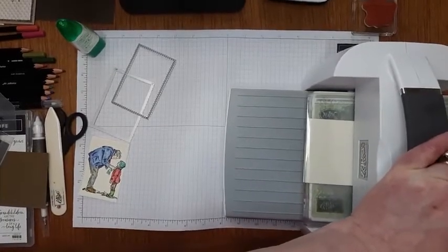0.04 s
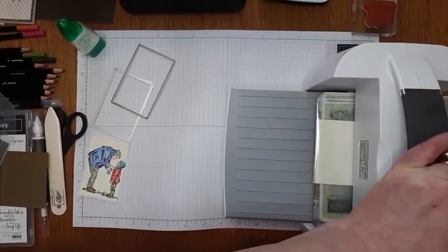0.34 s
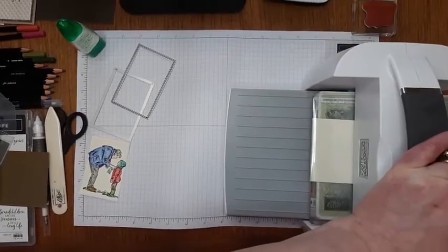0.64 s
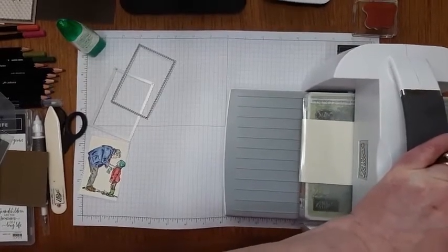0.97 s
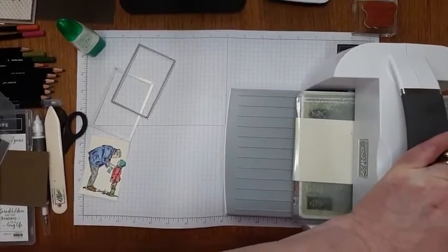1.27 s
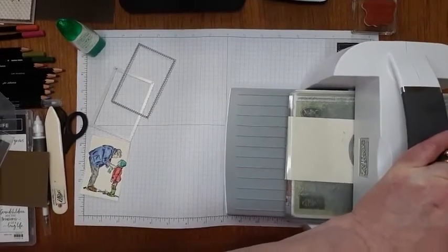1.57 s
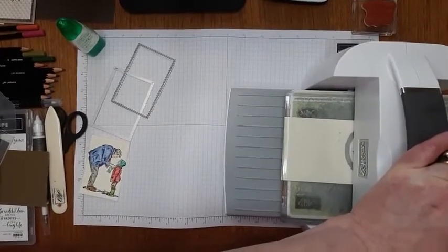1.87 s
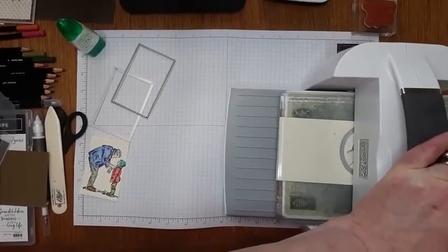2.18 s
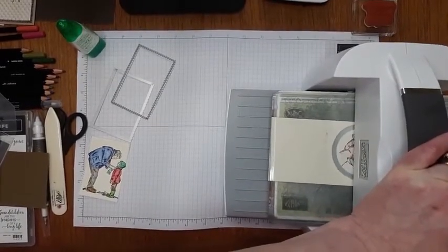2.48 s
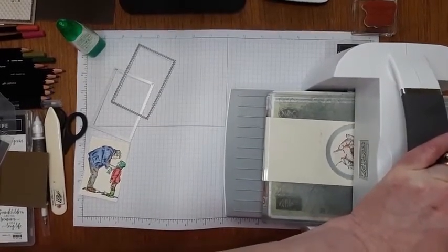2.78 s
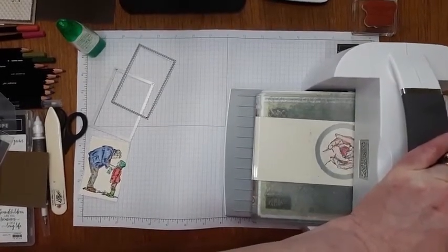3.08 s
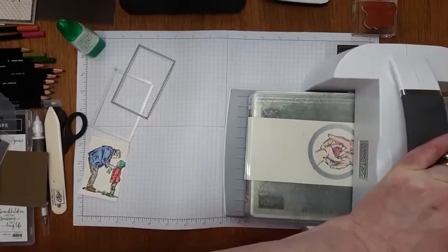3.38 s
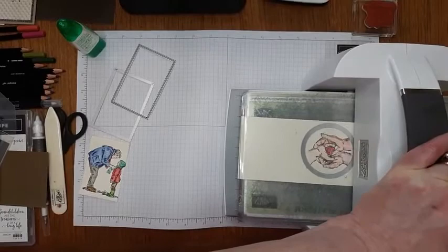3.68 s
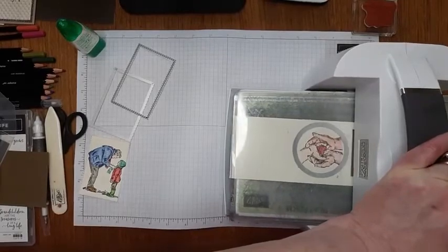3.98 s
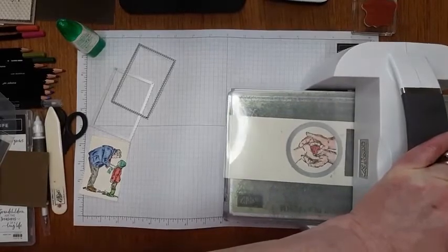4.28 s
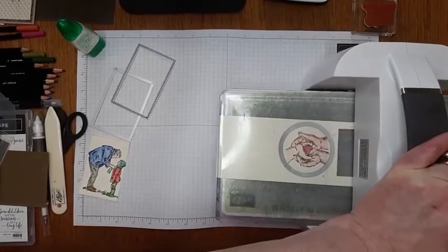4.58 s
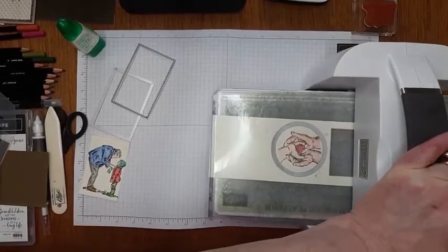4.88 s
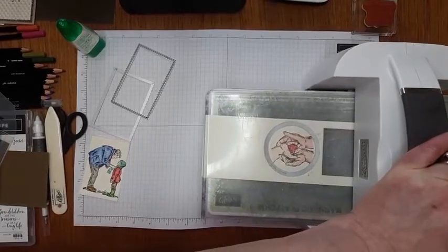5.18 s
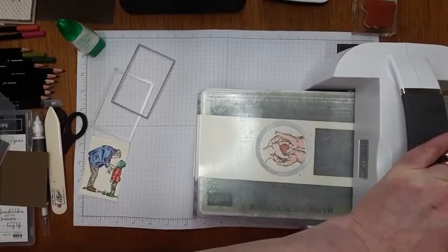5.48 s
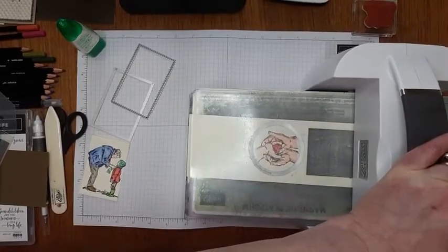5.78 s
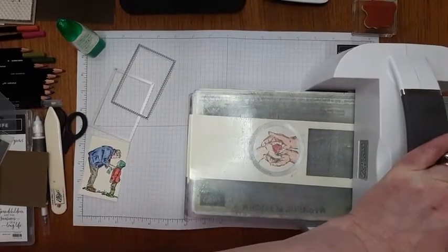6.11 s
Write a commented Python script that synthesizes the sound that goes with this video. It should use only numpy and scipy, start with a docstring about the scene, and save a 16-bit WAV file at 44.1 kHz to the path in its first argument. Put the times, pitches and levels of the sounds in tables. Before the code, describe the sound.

A hand-cranked die-cutting machine rolls plastic plates through with faint grinding, small knocks and three loud, rattling clunks.

```python
"""A hand-cranked die-cutting machine on a wooden desk rolls plastic plates through, in a small room.
From the start rollers rumble, gears grind, plates scrape and the crank knocks softly over faint hiss.
At 0.24 s and 2.89 s the squeezed stack snaps over an edge: a loud, rattling clunk, a thump on the desk.
Near 5 s the freed end swishes over the bed and the plastic squeaks under load.
A third clunk follows at 5.58 s; the freed plates tap and ping."""
import sys
import numpy as np
from scipy import signal
from scipy.fft import rfft, irfft
from scipy.io import wavfile

SR = 44100
rng = np.random.default_rng(int(sys.argv[2]) if len(sys.argv) > 2 else 0)


def to_wav(sig):
    """Store sig (one row per channel, or 1-D mono) as 16-bit WAV at the path in sys.argv[1].

    Samples outside -1..1 are clipped; the rate is SR.
    """
    pcm = np.clip(np.atleast_2d(sig), -1, 1) * 32767
    pcm = np.round(pcm).astype(np.int16)
    wavfile.write(sys.argv[1], SR, pcm.T)  # frames by channels


N = 275562
TIME_S = np.arange(N) / SR
FREQ_HZ = np.fft.rfftfreq(N, 1 / SR)


def amp(db):
    """Decibels to gain."""
    return 10 ** (np.asarray(db) / 20)


def unit(x):
    """Scale to rms 1."""
    return x / np.sqrt(np.mean(x ** 2) + 1e-20)


def decay(t, t60_s):
    """Exponential fall, 60 dB in t60_s."""
    return np.exp(-np.log(1000) * t / t60_s)


def bell(offset, half_width):
    """Gaussian, 1/e at half_width."""
    return np.exp(-(offset / half_width) ** 2)


def curve(points, hz):
    """Interpolate on a log-frequency axis."""
    freq_hz, value = np.transpose(points)
    return np.interp(np.log(hz + 1), np.log(freq_hz), value)


def add(mix, start_s, sound):
    """Mix a sound in at start_s."""
    part = mix[max(round(start_s * SR), 0):][:len(sound)]
    part += sound[:len(part)]


def minimum_phase(gain):
    """Response with these gains that rings only after its cause."""
    log_gain = np.log(gain + 1e-9)
    mirrored = np.concatenate([log_gain, log_gain[-2:0:-1]])
    return np.exp(np.conj(signal.hilbert(mirrored)))[:len(gain)]


def coloured(x, spectrum):
    """Filter x by a spectrum; rms 1."""
    return unit(irfft(rfft(x) * amp(curve(spectrum, FREQ_HZ)), N))


# Room decay: freq_hz, t60_s
ROOM_DECAY = [(100, 0.55), (400, 0.34), (1000, .43), (2500, .36), (5500, .31), (8500, 0.22), (13000, 0.23)]

def room(build_s=0.0067, size=22050):
    """Dense reflections build up, then die sooner in the treble; energy 1."""
    hz, t, noise = signal.stft(rng.standard_normal(size), SR, nperseg=256)
    damped = noise * decay(t, curve(ROOM_DECAY, hz)[:, None])
    tail = signal.istft(damped, SR, nperseg=256)[1][:size]
    tail *= 1 - bell(np.arange(size) / SR, build_s)
    return tail / np.linalg.norm(tail)


# Plate and tray resonances: centre_hz, width_hz, height_db
PLATE_RESONANCES = [(712, 150, 5.5), (1060, 260, 5.5), (1608, 76, 4.5), (1846, 30, 4), (2180, 27, 0.5),
                    (2610, 150, 2), (3320, 21, 1.5), (3680, 260, 4.5), (4520, 120, 4.5), (5440, 260, 4),
                    (6280, 90, -0.5), (6830, 750, 3), (7070, 140, 0.5)]

def plate_gain_db(hz):
    """Short-lived resonances of plates and tray colour each contact."""
    return sum(height_db / (1 + (2 * (hz - centre_hz) / width_hz) ** 2)
               for centre_hz, width_hz, height_db in PLATE_RESONANCES)


def micro_slips(per_s, spread_db):
    """Random train of tiny slips, a few much larger than the rest."""
    sizes = amp(spread_db * np.minimum(rng.exponential(1, N), 4))
    return unit(sizes * rng.standard_normal(N) * (rng.random(N) < per_s / SR))


def friction(level_db, spectrum, per_s, spread_db, wet_db):
    """Tiny slips shake a machine part, ring in the plates and echo in the room."""
    slips = micro_slips(per_s, spread_db)
    echoing = slips + amp(wet_db) * signal.fftconvolve(slips, room())[:N]
    resonant = irfft(rfft(echoing) * amp(plate_gain_db(FREQ_HZ)), N)
    return amp(level_db) * coloured(resonant, spectrum)


# Relative friction levels: time_s, rumble_db, grind_db, scrape_db
CRANK_LEVELS = [(0, -54, -58.5, -57), (.19, -72, -80.5, -82), (.65, -71.5, -70.5, -76),
                (.86, -61.5, -58, -108), (1.049, -72.5, -69, -79.5), (1.278, -68.5, -59, -62),
                (1.55, -65, -67, -74.5), (1.76, -72.5, -78.5, -84), (2.07, -72.5, -78.5, -83),
                (2.219, -62.5, -63.5, -77), (2.601, -64.5, -64, -76), (3.348, -68, -66.5, -74),
                (3.681, -83, -79, -96), (3.97, -67.5, -66.5, -78), (4.3, -72, -71, -87.5),
                (4.72, -64.5, -64, -84), (5.5, -63, -66.5, -83), (6.25, -63.5, -57, -65)]
# Roller, gear and plate spectra: freq_hz, gain_db
ROLLER_SPECTRUM = [(25, -25.5), (60, -14), (110, -7), (170, -0.5), (240, -8), (420, -8), (600, -12),
                   (1200, -51)]
GEAR_SPECTRUM = [(300, -28.5), (550, -10), (720, -3), (860, -8.5), (1040, -0.5), (1320, -9), (1680, -10.5),
                 (2200, -19), (4000, -39)]
SCRAPE_SPECTRUM = [(900, -24), (1700, 8), (2300, 2.5), (3100, -8.5), (3700, -1.5), (4800, -15),
                   (7000, -13.5), (9000, -33.5), (14000, -38)]

def cranking():
    """Rollers rumble, gears grind, plates scrape along the bed."""
    time_s, *levels_db = np.transpose(CRANK_LEVELS)
    rumble_db, grind_db, scrape_db = (np.interp(TIME_S, time_s, db) for db in levels_db)
    rollers = friction(rumble_db + 2, ROLLER_SPECTRUM, per_s=1300, spread_db=2.5, wet_db=0)
    gears = friction(grind_db - 2.5, GEAR_SPECTRUM, per_s=800, spread_db=3.5, wet_db=0.5)
    scrape = friction(scrape_db - 1.5, SCRAPE_SPECTRUM, per_s=820, spread_db=7, wet_db=6.5)
    return rollers + gears + scrape


# Hiss spectrum: freq_hz, gain_db
HISS_SPECTRUM = [(25, 3), (150, 10), (500, -2.5), (2000, 3), (4500, 4), (6000, 3.5), (6900, 12.5),
                 (7600, -0.5), (14000, 1)]

def hiss(level_db=-75, sink_s=0.9, hold_s=0.26, return_s=0.92):
    """Faint hiss peaking near 7 kHz; dips after the first two clunks, lifts slightly after the third."""
    corners_s = np.cumsum([0, sink_s, hold_s, return_s])
    dip_db = sum(depth_db * np.interp(TIME_S - snap_s, corners_s, [0, 1, 1, 0])
                 for snap_s, *_, depth_db in STACK_CLUNKS)
    return amp(level_db - dip_db) * coloured(rng.standard_normal(N), HISS_SPECTRUM)


# Struck housing spectrum: freq_hz, gain_db
HOUSING_SPECTRUM = [(30, -28.5), (70, -23), (115, -6), (165, 0.5), (225, -2), (420, -2.5), (600, -5),
                    (930, -5), (1400, -6), (2600, -5.5), (4600, -11), (7000, -8.5), (8600, -20.5),
                    (14000, -26.5)]

def blow(bass_db, treble_db, spot_hz, spot_db, chatter_s, size=8192):
    """One chattering contact: harder is brighter, and the struck spot adds its pitch."""
    t, hz = np.arange(size) / SR, np.fft.rfftfreq(size, 1 / SR)
    chatter = rfft(rng.standard_normal(size) * (0.23 + t / chatter_s) * bell(t, chatter_s))
    hardness_db = curve([(220, bass_db), (800, 0.0032), (1500, 0.0068), (6000, treble_db)], hz)
    spot_peak_db = spot_db * bell(np.log((hz + 1) / spot_hz), 0.18)
    colour = amp(curve(HOUSING_SPECTRUM, hz) + plate_gain_db(hz) + hardness_db + spot_peak_db)
    # Flattened chatter spreads the blow in time; machine and contact set the colour.
    magnitude = np.hypot(abs(chatter), 0.25 * abs(chatter).mean()) / 1.09
    return irfft(chatter * minimum_phase(colour / magnitude))


# Housing, plate and desk modes: pitch_hz, relative_db, uncapped_t60_s
BODY_MODES = [(141, -9.5, 0.12), (166, -4, .42), (287.4, -5.5, 0.93), (335.3, -3, 0.99), (398, -0.5, 0.41),
              (465.5, -3.5, .25), (520, -7, .35), (677, -5, .35), (785, -10, .32), (853, -2.5, 0.85),
              (861, -8.5, .28), (955, -4, .28), (999, 10, 0.033), (1086, -1.5, 0.11), (1155, -3, .3),
              (1605, -2.5, 0.089), (1760, -0.5, 0.22), (1922, -6.5, .26), (2280, -6.5, 0.18),
              (2710, 3.5, 0.11), (3320, -4, .25), (4930, -5, 0.18)]

def body_ring(max_t60_s=0.4, size=22050):
    """Modes left ringing by a blow; energy 1."""
    t = np.arange(size) / SR
    hz, db, t60_s = np.transpose(BODY_MODES)[:, :, None]
    envelopes = amp(db) * decay(t, np.minimum(t60_s, max_t60_s))
    modes = (envelopes * np.sin(2 * np.pi * (hz * t + rng.random(hz.shape)))).sum(0)
    return modes / np.linalg.norm(modes)


def strikes(rows, chatter_s, gain_db, ring_db, wet_db):
    """Each blow sounds directly, then as a tail through the ringing machine and the room."""
    out = np.zeros(N)
    for start_s, level_db, bass_db, treble_db, spot_hz, spot_db, tail_db in rows:
        hit = amp(level_db + gain_db) * blow(bass_db, treble_db, spot_hz, spot_db, chatter_s)
        response = amp(wet_db) * room() + amp(ring_db) * body_ring()
        add(out, start_s, hit)
        add(out, start_s, amp(tail_db) * signal.fftconvolve(hit, response))
    return out


# Light blows: start_s, relative_db, treble_db, spot_hz, spot_db, tail_db
CRANK_KNOCKS = [(.027, -54.5, -7, 1610, 8, -9), (.8315, -50, -5.5, 2210, 4.5, -0.5),
                (1.3715, -51.5, -16.5, 3630, 12, -4), (1.8327, -58, -25.5, 641, 6, -2),
                (1.8522, -43.5, -22, 1827, 10.5, -1), (2.319, -48.5, -28, 1067, 12, -6),
                (2.419, -51.5, -33.5, 1100, 6.5, -6.5), (2.7368, -58, -42, 650, 7, -1.5),
                (2.758, -47, -46, 1115, 9, -5), (3.067, -40, -3, 1120, 8.5, -0.5),
                (3.145, -45, -15.5, 2520, 5, -4), (3.4226, -47.5, -2.5, 2080, 5.5, 0.5),
                (3.431, -51.5, -3.5, 1830, 9.5, -14), (4.103, -65, -25, 1047, 9.5, 0),
                (4.401, -63.5, -30.5, 630, 16.5, 1.5), (4.651, -56.5, -20.5, 1086, 6.5, -5),
                (5.3846, -43.5, -24.5, 1250, 4, 0), (5.5155, -51, -15, 1680, 5.5, 3),
                (5.535, -53, -4.5, 2470, 15, 7.5), (5.613, -38.5, -7, 806, -3, -1),
                (5.6255, -40.5, 8.5, 7160, -1.5, -3), (5.635, -37, -8, 4000, 15.5, -6.5),
                (5.668, -36, -10, 730, 0, -24), (5.6975, -39, -4, 3510, 3.5, -8.5),
                (5.742, -48, -19.5, 2630, 9.5, 6.5), (5.763, -54, 4.5, 3320, 7, -7),
                (5.9294, -40, -9.5, 1364, 5.5, -1.5), (5.962, -51, -3, 3520, 9, 12),
                (5.9803, -36.5, -3, 690, 7.5, -7.5), (6.1389, -45, -18, 990, 4, -1.5),
                (6.189, -56.5, -7, 5150, 10.5, -0.5)]

def knocks(bass_db=-2):
    """Play in the crank and taps of the plates knock the housing."""
    rows = [(start_s, level_db, bass_db, *colour) for start_s, level_db, *colour in CRANK_KNOCKS]
    return strikes(rows, chatter_s=0.0055, gain_db=36.5, ring_db=-9.5, wet_db=-2)


# One clunk per crank turn: snap_s, relative_db, bass_db, treble_db, snap_hz, tail_db,
# slip_lead_s, slip_db, land_delay_s, land_db, land_hz, bounce_gap_s, hiss_dip_db
STACK_CLUNKS = [(0.2372, -20, -1.5, -2, 882, -2, .0125, -12, .0225, -2.5, 439, .007, 11.5),
                (2.8895, -26, 0.5, 4.5, 1900, -1, .014, -13, .025, -2, 494.7, 0.011, 8.5),
                (5.579, -24.5, 0, -17, 2610, -6.5, .0105, -9, .011, -12, 720, .0055, -1)]

def clunk(snap_s, level_db, bass_db, treble_db, snap_hz, tail_db,
          slip_lead_s, slip_db, land_delay_s, land_db, land_hz, bounce_gap_s):
    """The squeezed stack slips twice, snaps over an edge, touches down, lands and bounces."""
    tray_hz, slip_bass_db = 1110, -10  # slips sound the hollow tray
    slip_spot_db, snap_spot_db, land_spot_db = 8, 3, 7
    slip_colour = (slip_bass_db, treble_db + 4.5, tray_hz, slip_spot_db, tail_db - 1.5)
    first_slip = (snap_s - 2 * slip_lead_s, level_db + slip_db - 27.5, *slip_colour)
    second_slip = (snap_s - slip_lead_s, level_db + slip_db, *slip_colour)
    snap = (snap_s, level_db, bass_db - 9, treble_db, snap_hz, snap_spot_db, tail_db)
    bounces = []
    for k in range(-1, 4):  # -1: touchdown, 0: landing; each contact heavier and duller
        start_s = snap_s + land_delay_s + k * bounce_gap_s
        bounce_db = level_db + land_db - 2 * abs(k)
        colour = (bass_db + 2 + k, treble_db + 0.5 - 4 * k, land_hz, land_spot_db, tail_db - 8)
        bounces.append((start_s, bounce_db, *colour))
    stages = [([first_slip], 0.0045), ([second_slip], 0.006), ([snap], 0.0045), (bounces, 0.007)]
    return sum(strikes(rows, chatter_s, gain_db=43.5, ring_db=-12, wet_db=1)
               for rows, chatter_s in stages)


# Thin plate tones: pitch_hz, relative_db
PLATE_PARTIALS = [(1577, -55.5), (1922, -55), (2724, -56.5), (3569, -59), (4581, -60), (4850, -62.5),
                  (5604, -57.5), (6449, -60.5), (6880, -58), (7294, -59.5)]

def plate_ring(gain_db=26, rise_s=0.012, t60_s=0.33):
    """Each snap sets the plates ringing; the harder and brighter, the louder."""
    t, out = np.arange(SR) / SR, np.zeros(N)
    envelope = (1 - np.exp(-t / rise_s)) * decay(t, t60_s)
    for snap_s, level_db, _, treble_db, *_ in STACK_CLUNKS:
        tones = sum(amp(db) * np.sin(2 * np.pi * (hz * t + rng.random())) for hz, db in PLATE_PARTIALS)
        add(out, snap_s, amp(gain_db + level_db + treble_db) * envelope * tones)
    return out


# Low swings: centre_s, peak_db, pitch_hz, half_length_s
DESK_THUMPS = [(.27, -26, 140, 0.013), (2.93, -25, 171.7, 0.028), (2.921, -38, 80, .025),
               (3.94, -55.5, 125, 0.021), (4.331, -49.5, 77, 0.0058), (4.663, -50.5, 178.4, 0.013),
               (4.844, -47, 191.4, 0.0099), (4.886, -55.5, 178.3, 0.019), (5.607, -50.5, 44.7, 0.031)]

def thumps():
    """The machine rocks softly on the desk."""
    return sum(amp(db) * bell(TIME_S - centre_s, half_s) * np.sin(2 * np.pi * hz * (TIME_S - centre_s))
               for centre_s, db, hz, half_s in DESK_THUMPS)


# Gritty swells: centre_s, relative_db, half_length_s, centre_hz, spread_octaves
BED_RUBS = [(.795, -64, .04, 1500, 1.1), (1.19, -60, .02, 1500, 1.1), (1.285, -61, .06, 2200, 1.8),
            (1.53, -70, .05, 2700, 1.1), (1.6, -63, .025, 1850, .7), (2.19, -59, .04, 1250, .8),
            (2.36, -61, .025, 1500, 1), (2.545, -61, .03, 1900, .6), (3.345, -61, .02, 1500, .9),
            (4.48, -68, .02, 1700, .7), (5.31, -60, .015, 1200, 1.2)]

def rubs(gain_db=-1, wet_db=-5):
    """The plates catch and rub on the bed in short swells of tiny slips."""
    body = amp(curve(HOUSING_SPECTRUM, FREQ_HZ) + plate_gain_db(FREQ_HZ))
    out = np.zeros(N)
    for centre_s, level_db, half_s, centre_hz, octaves in BED_RUBS:
        band = bell(np.log2((FREQ_HZ + 1) / centre_hz), octaves)
        slips = micro_slips(per_s=2500, spread_db=3)
        grit = unit(irfft(rfft(slips) * band * body, N))
        out += amp(level_db + gain_db) * bell(TIME_S - centre_s, half_s) * grit
    return out + amp(wet_db) * signal.fftconvolve(out, room())[:N]


# Sliding plastic spectrum: freq_hz, gain_db
SLIDE_SPECTRUM = [(3500, -29), (5200, -2), (6900, 2.5), (7800, -22)]

def slide(centre_s=5.08, half_length_s=0.89, level_db=-79):
    """The freed end of the stack slides over the bed: a thin swish that swells and fades."""
    swish = friction(level_db, SLIDE_SPECTRUM, per_s=5000, spread_db=2.5, wet_db=-0.5)
    return bell(TIME_S - centre_s, half_length_s) * swish


def squeak(start_s=4.88, end_s=5.28, from_hz=1720, to_hz=1850, fuzz_hz=110, level_db=-72):
    """Plastic rubs under load: a faint, fuzzy, rising whine."""
    progress = np.clip((TIME_S - start_s) / (end_s - start_s), 0, 1)
    lowpass = signal.butter(2, fuzz_hz, fs=SR, output="sos")
    fuzz_i, fuzz_q = unit(signal.sosfilt(lowpass, rng.standard_normal((2, N))))
    phase = 2 * np.pi * np.cumsum(from_hz + (to_hz - from_hz) * progress) / SR
    envelope = np.sqrt(abs(np.sin(np.pi * progress)))
    return amp(level_db) * envelope * (fuzz_i * np.cos(phase) + fuzz_q * np.sin(phase))


# Plate pings: start_s, peak_db, pitch_hz, t60_s
PLATE_PINGS = [(5.385, -55, 2960, .22), (5.635, -45, 3700, .35), (5.635, -46, 4100, .3),
               (5.981, -51, 3700, .45)]

def pings(pair_ratio=1.015):
    """The freed plates ring briefly; close mode pairs beat as they die."""
    t, out = np.arange(SR) / SR, np.zeros(N)
    for start_s, peak_db, hz, t60_s in PLATE_PINGS:
        pair = np.sin(2 * np.pi * hz * t) + np.sin(2 * np.pi * (hz * pair_ratio * t + rng.random()))
        add(out, start_s, 0.5 * amp(peak_db) * pair * decay(t, t60_s))
    return out


def scene():
    """The whole machine from above the desk, mono."""
    clunks = sum(clunk(*row[:-1]) for row in STACK_CLUNKS)
    impacts = clunks + knocks() + pings() + thumps()
    return (impacts + rubs() + cranking() + squeak() + hiss() + plate_ring() + slide())[None]


def record(dry):
    """Low-pass at 14.25 kHz."""
    lowpass = signal.firwin(301, 14250, window=("kaiser", 8), fs=SR)
    return signal.oaconvolve(dry, lowpass[None], "same")


dry = scene()
out = record(dry)
to_wav(out)
```